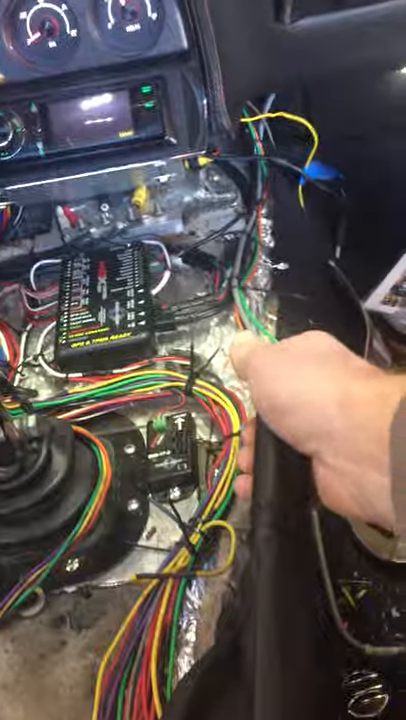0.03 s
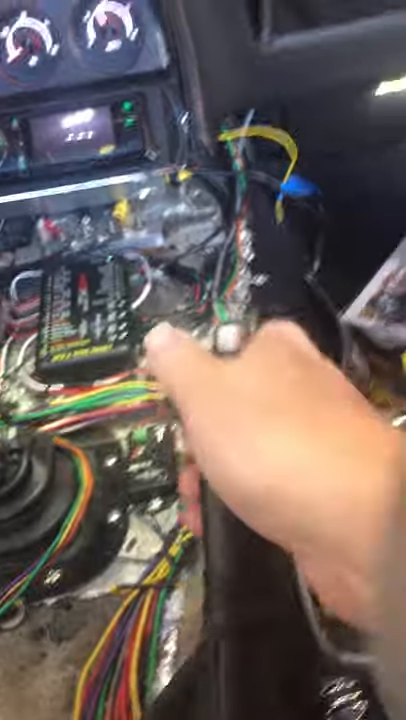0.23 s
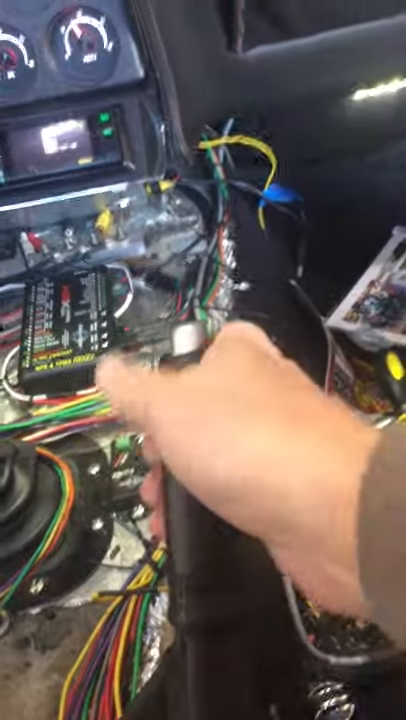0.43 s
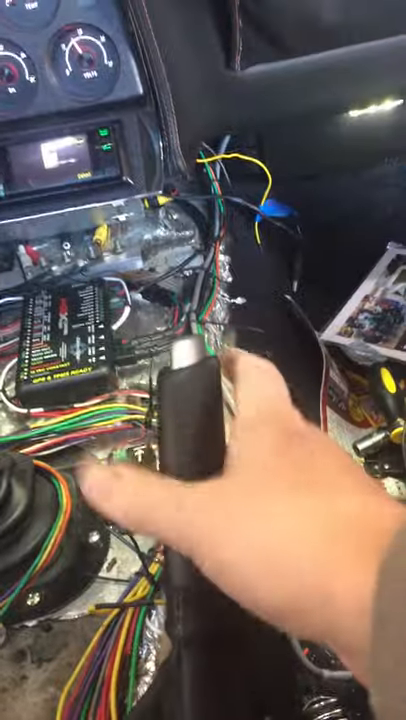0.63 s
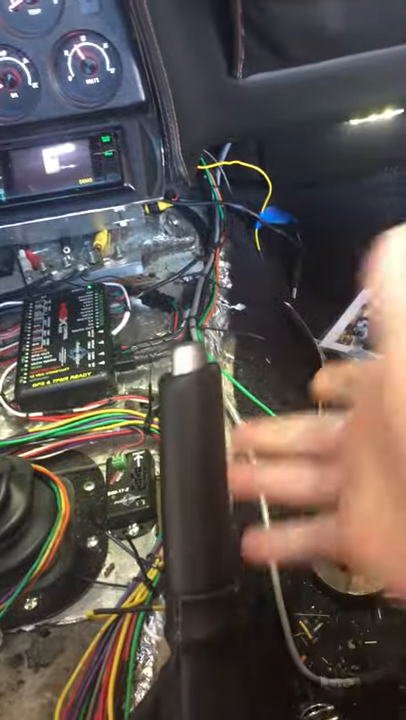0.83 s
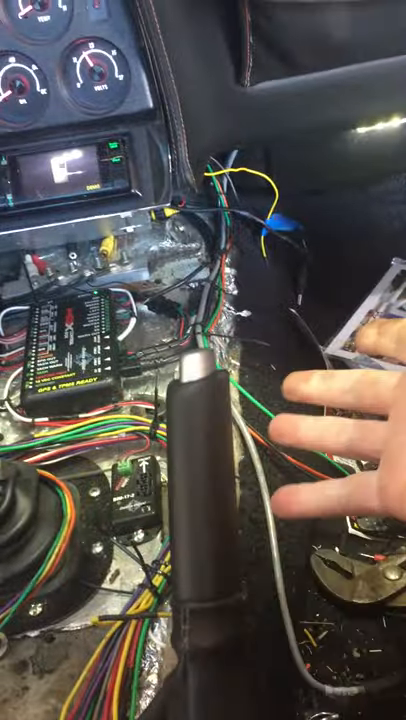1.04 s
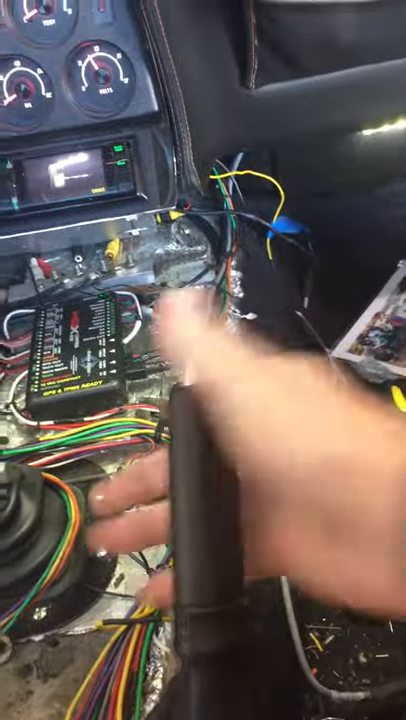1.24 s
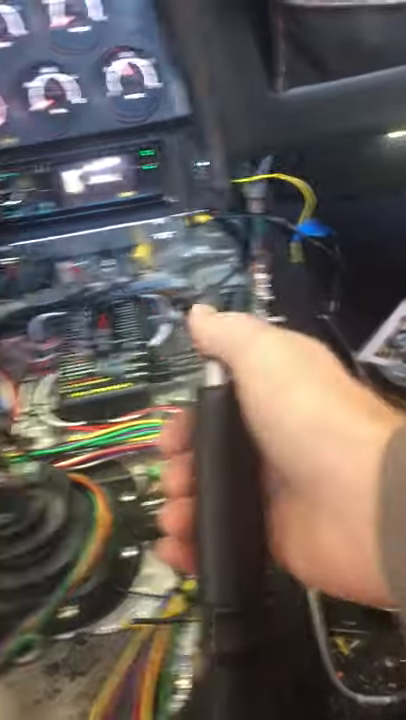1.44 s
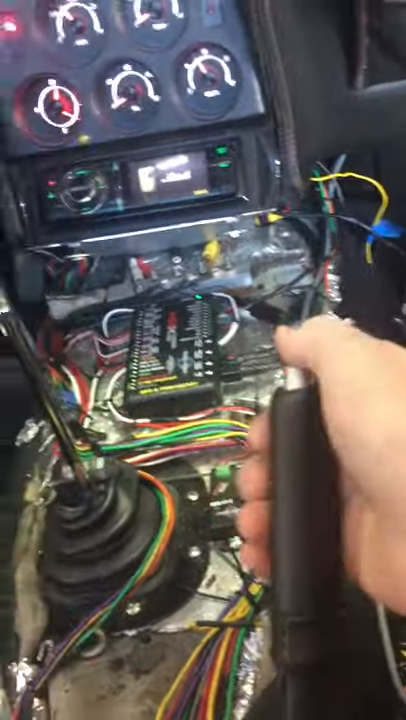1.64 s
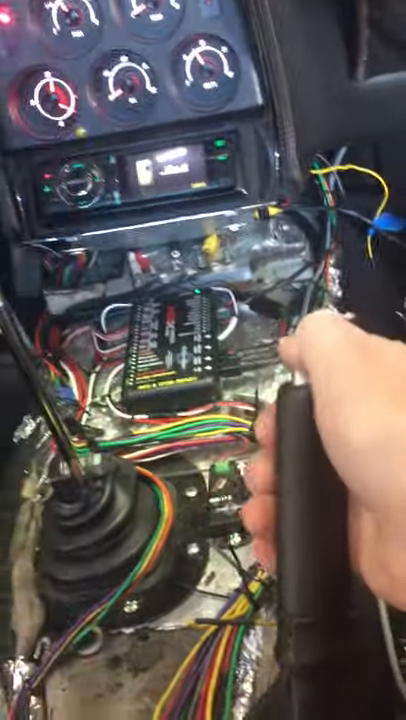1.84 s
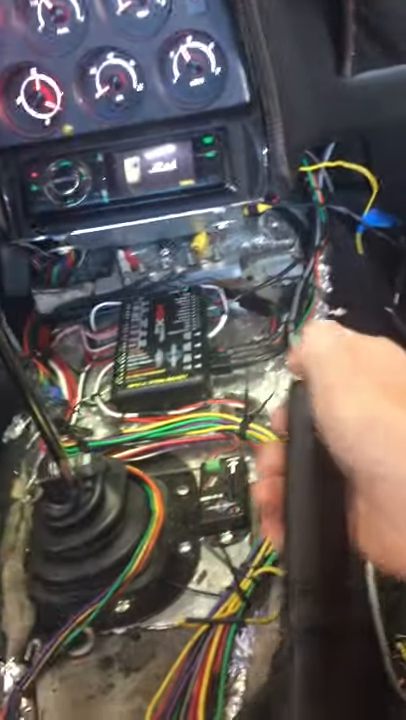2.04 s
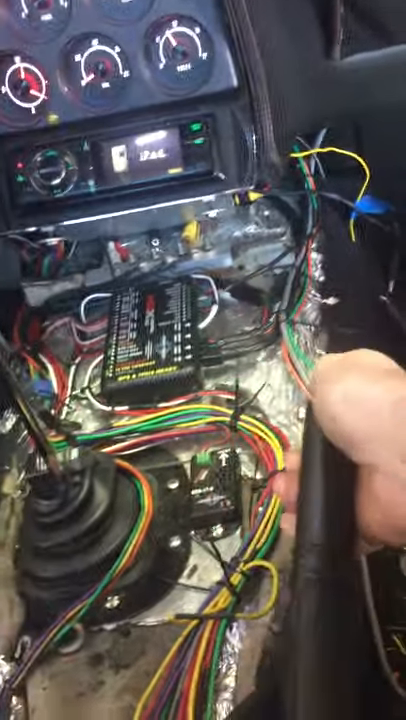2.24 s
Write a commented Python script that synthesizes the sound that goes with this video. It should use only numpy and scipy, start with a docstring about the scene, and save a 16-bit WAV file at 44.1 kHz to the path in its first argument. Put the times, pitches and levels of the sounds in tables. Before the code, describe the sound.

A handbrake is pulled up close by inside a quiet car, giving a fast ratcheting rattle with a low boom from about 0.2 to 0.4 seconds. Near 1.4 seconds a hand lands on the grip with a thump. The button clicks faintly around 1.8. At 2 seconds the lever releases with a sharp, heavy clunk, scrapes softly down and knocks onto its stop at about 2.25.

```python
"""Inside a parked car, microphone close to the handbrake. The lever is yanked up, the pawl rattles
over the ratchet teeth, and the hand slides off. The hand slaps back on the grip, the thumb presses
the button, the pawl snaps free, and the lever scrapes down onto its stop as the cable groans.
Blows are bursts of noise plus ringing modes; they boom in the floor pan and die quickly in the cabin."""
import sys
import numpy as np
from scipy import signal
from scipy.fft import rfft, irfft, next_fast_len
from scipy.io import wavfile

SR = 44100
rng = np.random.default_rng(int(sys.argv[2]) if len(sys.argv) > 2 else 0)


def wav_out(sig):
    """Save sig, one row per channel (or a flat mono array), as 16-bit PCM at SR to the path in sys.argv[1]."""
    wavfile.write(sys.argv[1], SR, np.round(np.clip(np.atleast_2d(sig).T, -1, 1) * 32767).astype(np.int16))


N = 101429
T = np.arange(SR) / SR  # one second, the time axis of a single blow


# pawl dropping over each tooth: start_s, level_db, tilt_db_per_octave, body_db, bite_db, bite_hz
TEETH = [(0.2389, -13, -1, -9, 6, 2500), (0.2539, -11.5, 0.5, -1, 7.5, 1610),
         (0.2601, -9, 1.5, 0, -3, 2660), (0.2681, -11, 1.84, 1.5, -6.5, 2770),
         (.275, -11, 3, 0.5, -1.5, 2700), (.283, -14, 1.75, -0.5, -0.5, 2700),
         (.2935, -13.5, 0, 0, 4, 2703), (0.3039, -12, 3, -2.5, 3.5, 2700), (0.3162, -11.5, 1, 1, 1, 2000),
         (0.3303, -12.5, 0.37, 2.5, -0.5, 2700), (0.3539, -12, 0.16, 4, 6, 2577)]
# one tooth, heard close up: frequency_hz, level_db
TOOTH_COLOUR = [(200, -11.5), (275, 5), (400, -6.5), (540, -2.5), (680, -7), (920, 3.5), (1750, 2),
                (2050, -2), (2700, 1), (3850, -2.5), (4250, -7), (5100, -10), (5600, -4.5), (8000, -6.5),
                (10500, -8.5), (15500, -11)]
# the steel mechanism ringing freely: pitch_hz, level_db, free_t60_s
RATCHET_MODES = [(548, -20.5, .11), (845, -20, 0.16), (1022, -14, 0.13), (1107, -27.5, .32),
                 (1340, -18.5, 0.12), (1367, -20, 0.14), (1705, -12.5, 0.086), (2530, -11, .05),
                 (2630, -31.5, 0.24), (3210, -22, 0.068), (3865, -11.5, .045), (4888, -51.5, .45),
                 (5410, -46, .45), (5740, -50, .45), (8590, -26.5, .07)]

def ratchet():
    """The pawl drops over tooth after tooth, slowing as the cable tightens."""
    out = np.zeros(N)
    common_noise = rng.standard_normal(SR)
    likeness, bite_octaves = 0.53, 0.45  # noise power the teeth share; width of the pawl's resonance
    for start_s, db, tilt, body_db, bite_db, bite_hz in TEETH:
        noise = np.sqrt(likeness) * common_noise + np.sqrt(1 - likeness) * rng.standard_normal(SR)
        body = lambda hz: body_db / (1 + (hz / 1400) ** 4)
        bite = lambda hz: bite_db * np.exp(-(np.log2((hz + 1) / bite_hz) / bite_octaves) ** 2)
        colour = lambda hz: along(TOOTH_COLOUR, hz) + body(hz) + bite(hz)
        click = clack(noise, colour, tilt, t60_s=0.032, rise_s=0.0006, snap=0)
        ringing = ring(RATCHET_MODES, t60_scale=0.91)
        add(out, start_s, amp(db) * (amp(0.66) * click + amp(-7) * ringing))
    return out


# blows inside the mechanism: start_s, level_db, tilt_db_per_octave, ring_db, clack_t60_s
CLUNKS = [(.473, -45.5, -5.5, -26, 0.032), (1.9992, -9.5, 0.5, -23, 0.0044), (2.0011, -11.5, 1, -13, 0.035),
          (2.16, -44.5, 10, -15, .038), (2.2035, -33, -4, -20, 0.006), (2.2402, -23.5, 0.8, 1.5, .05),
          (2.2815, -47.5, 3, -14, 0.051)]
# steel on steel: frequency_hz, level_db
CLUNK_COLOUR = [(200, 8.5), (290, 3.5), (430, -5), (600, 2), (730, 2.5), (980, 6), (1250, -8), (1900, -4.5),
                (2450, 1.5), (3300, -2.5), (4900, -11), (7500, -11), (8800, -10), (10200, -18),
                (15500, -17.5)]

def mechanism_clunks():
    """The lever settles, is freed, catches and hits its stop; a tight grip shortens the ringing."""
    return knocks(CLUNKS, CLUNK_COLOUR, RATCHET_MODES, t60_scale=0.55)


# shoves into the floor below the microphone: start_s, level_db, tilt_db_per_octave
SHOVES = [(0.221, -39.5, 8), (.254, -20, 11), (0.305, -21.5, -2), (0.3278, -28, -9.5), (0.3561, -35.5, 2.5),
          (0.435, -36, 9.5), (.472, -54, 3), (.753, -64, -19.5), (1.145, -67, -11), (1.349, -38.5, 0),
          (1.361, -24, 6.5), (1.374, -16, 2), (1.44, -33.5, 4.5), (1.511, -46, -1), (1.764, -52.5, 3.5),
          (1.837, -48.5, 0.5), (1.975, -47, 10), (2.0005, -18, 1), (2.015, -12, -1), (2.243, -28, 13.5),
          (2.252, -31, 10)]
# the floor pan ringing: pitch_hz, level_db, t60_s
PAN_MODES = [(65, -18, .14), (96.3, -2.5, 0.13), (147.4, 1.5, 0.077), (180, -11, 0.025),
             (268.4, -7.5, 0.07), (364.4, -21, 0.077), (434, -20, .07), (548.6, -21.5, 0.049)]

def floor_pan():
    """The sheet steel under the lever booms at each shove."""
    out = np.zeros(N)
    for start_s, db, tilt in SHOVES:
        boom = sum(amp(mode_db + tilt * np.log2(hz / 140)) * np.sin(2 * np.pi * hz * T) * fade(T, t60_s)
                   for hz, mode_db, t60_s in PAN_MODES)
        add(out, start_s, amp(db + 2) * boom * rise(T, 0.0037))
    return out


# the hand landing on the grip: start_s, level_db, tilt_db_per_octave, ring_db, clack_t60_s
GRABS = [(1.341, -45.5, 7.5, -26.5, 0.036), (1.353, -38.5, 7, -26.5, 0.023),
         (1.3605, -28.5, -2.5, -24, 0.051), (1.3688, -18.5, 0, 1.5, 0.031), (1.449, -60, 3, -13, 0.042),
         (1.49, -56, -3, -5, 0.059)]
# the dull slap of skin: frequency_hz, level_db
GRAB_COLOUR = [(150, -3.5), (450, 2.5), (620, 2), (790, -4.5), (1050, -5), (1400, -13), (1800, -5),
               (3200, -14.5), (4300, -20), (9000, -23.5), (15500, -34)]
# the grip tube ringing: pitch_hz, level_db, t60_s
GRIP_MODES = [(1753, -2, 0.027), (1971, -3.5, 0.042), (3790, -15, 0.025), (5670, -22, 0.047),
              (11670, -16, 0.028)]

def hand_slaps():
    """Fingers and palm land on the grip and ring its tube."""
    return knocks(GRABS, GRAB_COLOUR, GRIP_MODES)


# groans of the cable: start_s, length_s, level_db, pitch_hz
GROANS = [(2.2042, 0.0082, -37, 490), (2.214, 0.042, -39, 760), (2.248, 0.015, -33, 676),
          (2.288, 0.035, -38, 397)]

def cable():
    """The slackening cable gives short hollow groans, each a narrow band of noise."""
    out = np.zeros(N)
    width_octaves = 0.21
    for start_s, length_s, db, pitch_hz in GROANS:
        band = lambda hz: -20 * np.log10(1 + (np.log2((hz + 1) / pitch_hz) / width_octaves) ** 2)
        groan = unit(shaped(rng.standard_normal(SR), band))
        add(out, start_s, amp(db) * groan * rise(T, 0.000067) * np.exp(-(T / length_s) ** 2))
    return out


# the lever under load: time_s, level_db
STRAIN_LEVEL = [(.19, -72), (.215, -55.5), (.237, -39), (.34, -37), (.4, -54.5), (.48, -56), (.6, -77.5),
                (1.32, -110), (1.35, -52.5), (1.385, -51), (1.43, -58), (1.51, -78), (1.7, -100)]
# its dull rubbing: frequency_hz, level_db
STRAIN_COLOUR = [(100, 0.5), (350, 0.5), (700, -1), (1100, -1), (2600, -11), (4000, -18), (9000, -25),
                 (15500, -31.5)]

def lever_strain():
    """The lever rubs smoothly as it takes load, on the pull and when gripped again."""
    return rub(STRAIN_LEVEL, STRAIN_COLOUR, rough_db=0, slips_per_s=230)


# the lever on its way down: time_s, level_db
SCRAPE_LEVEL = [(1.92, -100), (1.975, -67), (1.997, -45.5), (2.04, -56), (2.11, -54), (2.135, -48),
                (2.19, -45), (2.235, -45), (2.27, -50.5), (2.3, -55)]
# its scrape: frequency_hz, level_db
SCRAPE_COLOUR = [(100, 3.5), (400, 5.5), (1200, -0.5), (2500, -3), (5000, -13), (9000, -19), (15500, -22)]

def lever_scrape():
    """The mechanism rubs in fine, fast slips as the lever is lowered."""
    return rub(SCRAPE_LEVEL, SCRAPE_COLOUR, rough_db=2, slips_per_s=1200)


# thumb on the button: start_s, level_db, tilt_db_per_octave, ring_db, clack_t60_s
PRESSES = [(1.748, -53, 1.5, 1, 0.062), (1.815, -63, 0.5, -7, 0.13)]
# the button's click: frequency_hz, level_db
PRESS_COLOUR = [(300, 9), (950, 1), (1200, -26), (2400, -1.5), (4800, -18), (6700, -7), (8000, -19),
                (15500, -27)]
# the button ringing: pitch_hz, level_db, t60_s
BUTTON_MODES = [(581, -0.5, 0.07), (855, 7.5, 0.027), (1780, 3.5, 0.035)]

def release_button():
    """The button clicks twice, softly, under the thumb."""
    return knocks(PRESSES, PRESS_COLOUR, BUTTON_MODES)


# skin on the grip: time_s, level_db
PALM_LEVEL = [(.53, -85.5), (.594, -59.5), (.638, -58), (.652, -70), (.665, -94.5), (1.31, -94),
              (1.35, -64.5), (1.405, -62), (1.43, -77.5), (1.5, -75.5), (1.58, -92)]
# its bright hiss: frequency_hz, level_db
PALM_COLOUR = [(1000, -20.5), (2200, -9), (3500, -1), (8000, 1.5), (12000, -2), (15500, -7.5)]

def palm():
    """Skin brushes the grip as the hand slides off and later closes on it again."""
    return rub(PALM_LEVEL, PALM_COLOUR, rough_db=0.7, slips_per_s=120)


# the arm moving near the microphone: time_s, level_db
SLEEVE_LEVEL = [(0, -83), (.16, -86), (.7, -90), (.82, -79), (.94, -78), (1.05, -90)]
# cloth rustle: frequency_hz, level_db
SLEEVE_COLOUR = [(300, -10.5), (1100, 0.5), (1900, -2.5), (3300, -0.5), (5000, -10), (15500, -21)]

def sleeve():
    """The sleeve rustles faintly in slow, uneven slips."""
    return rub(SLEEVE_LEVEL, SLEEVE_COLOUR, rough_db=3, slips_per_s=33)


# the car body all around: time_s, level_db
SHUDDER_LEVEL = [(.18, -86), (.22, -44.5), (.27, -26), (.34, -30), (.39, -35.5), (.48, -50.5), (.56, -51),
                 (.75, -68), (.82, -80.5), (1.9, -81), (1.965, -62), (2.02, -33.5), (2.12, -45.5),
                 (2.18, -52.5), (2.3, -31.5)]
# its rumble: frequency_hz, level_db
SHUDDER_COLOUR = [(35, -30.5), (60, -8.5), (85, 3), (120, -11.5), (180, -22), (250, -12.5), (360, -13.5),
                  (520, -29.5), (1500, -60)]

def body_shudder():
    """The car body rumbles after each stroke of the lever."""
    return level(SHUDDER_LEVEL) * steady_noise(SHUDDER_COLOUR)


# decay of the cabin: frequency_hz, t60_s
CABIN_DECAY = [(70, 0.19), (150, 0.21), (330, 0.15), (1000, .3), (3000, 0.24), (12000, 0.19)]
# relative strength of its tail at the microphone: frequency_hz, level_db
CABIN_COLOUR = [(50, -11.5), (90, -13.5), (160, -4.5), (350, -6), (1000, -16.5), (3000, -21.5),
                (12000, -25)]

def cabin(x, wet_db):
    """The direct sound plus the cabin's short tail, full in the bass and faint in the treble."""
    hz, t, spectrum = signal.stft(rng.standard_normal(SR), SR, nperseg=512)
    t60_s = along(CABIN_DECAY, hz)[:, None]
    gain = amp(wet_db + along(CABIN_COLOUR, hz))[:, None]
    unit_energy = np.sqrt(2 * np.log(1000) / (t60_s * SR))
    tail = signal.istft(spectrum * gain * unit_energy * fade(t, t60_s), SR, nperseg=512)[1]
    tail *= rise(np.arange(len(tail)) / SR, 0.0018)
    return x + signal.fftconvolve(x, tail)[:N]


# room tone in the parked car: frequency_hz, level_db
ROOM_TONE_COLOUR = [(20, -9.5), (50, 3), (90, -8.5), (200, -13), (500, -20), (1500, -22.5), (5000, -28),
                    (15500, -35.5)]

def room_tone():
    """A faint, deep, steady noise under everything."""
    return amp(-70) * steady_noise(ROOM_TONE_COLOUR)


def knocks(blows, colour, modes, t60_scale=1):
    """Single blows clack and ring the part that they strike."""
    out = np.zeros(N)
    for start_s, db, tilt, ring_db, t60_s in blows:
        noise = rng.standard_normal(SR)
        contact = clack(noise, lambda hz: along(colour, hz), tilt, t60_s, rise_s=0.000067, snap=1)
        add(out, start_s, amp(db) * (contact + amp(ring_db) * ring(modes, t60_scale)))
    return out


def clack(noise, colour, tilt, t60_s, rise_s, snap):
    """Crowded, quickly damped modes after one contact; snap lifts its first instant."""
    hold_s, snap_s = 0.001, 0.00021
    low_cut = lambda hz: -10 * np.log10(1 + (150 / (hz + 1)) ** 6)
    body = unit(shaped(noise, lambda hz: colour(hz) + tilt * np.log2((hz + 1) / 2500) + low_cut(hz)))
    decay = fade(np.maximum(T - hold_s, 0), t60_s) + snap * np.exp(-T / snap_s)
    return body * rise(T, rise_s) * decay


def ring(modes, t60_scale):
    """Damped modes that build up briefly, struck a little differently each time."""
    tones = np.zeros(SR)
    for hz, db, t60_s in modes:
        gain = amp(db + 2 * rng.normal())
        tones += gain * np.sin(2 * np.pi * (hz * T + rng.random())) * fade(T, t60_s * t60_scale)
    return tones * rise(T, 0.0008)


def rub(levels, colour, rough_db, slips_per_s):
    """Friction: noise broken into tiny slips of uneven size."""
    slips = np.interp(np.arange(N) * slips_per_s / SR, np.arange(N), rng.standard_normal(N))
    rough_noise = rng.standard_normal(N) * amp(rough_db * slips)
    return level(levels) * unit(shaped(rough_noise, lambda hz: along(colour, hz)))


def steady_noise(colour):
    """Coloured noise of rms 1."""
    return unit(shaped(rng.standard_normal(N), lambda hz: along(colour, hz)))


def shaped(x, gain_db):
    """x coloured by a dB function of frequency."""
    size = next_fast_len(len(x) + 8192)
    return irfft(rfft(x, size) * amp(gain_db(np.fft.rfftfreq(size, 1 / SR))), size)[:len(x)]


def along(points, hz):
    """(frequency_hz, value) points joined on a log axis."""
    frequencies, values = np.transpose(points)
    return np.interp(np.log(hz + 1), np.log(frequencies + 1), values)


def level(points):
    """(time_s, level_db) points as a gain per sample."""
    return amp(np.interp(np.arange(N) / SR, *np.transpose(points)))


def amp(db):
    """Decibels to gain."""
    return 10 ** (np.asarray(db) / 20)


def unit(x):
    """Scale to rms 1."""
    return x / np.sqrt(np.mean(x ** 2) + 1e-20)


def rise(t, rise_s):
    """Exponential attack."""
    return 1 - np.exp(-t / rise_s)


def fade(t, t60_s):
    """Exponential decay."""
    return np.exp(-np.log(1000) * t / t60_s)


def add(out, start_s, x):
    """Mix x into out at start_s."""
    part = out[round(start_s * SR):][:len(x)]
    part += x[:len(part)]


def scene():
    """Lever, hand and floor pan in the quiet cabin, in mono from close by."""
    friction = lever_scrape() + lever_strain()
    brushing = palm() + sleeve()
    rumble = body_shudder()
    blows = hand_slaps() + release_button() + mechanism_clunks()
    handbrake = cabin(ratchet(), wet_db=2) + cabin(blows + friction + cable(), wet_db=-0.5)
    boom = cabin(floor_pan(), wet_db=3)
    return (handbrake + boom + rumble + brushing + room_tone())[None]


def record(dry):
    """The microphone thins the deepest bass, rounds the highest peaks and cuts the top treble."""
    low_cut_hz, ceiling, top_hz = 46, 0.8, 15650
    thinned = signal.sosfilt(signal.butter(4, low_cut_hz, "high", fs=SR, output="sos"), dry[0])
    rounded = thinned / (1 + np.abs(thinned / ceiling) ** 4) ** (1 / 4)
    return shaped(rounded, lambda hz: -np.clip((hz - top_hz) / 18, 0, 120))[None]


dry = scene()
out = record(dry)
wav_out(out)
```